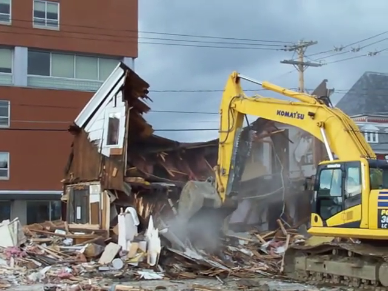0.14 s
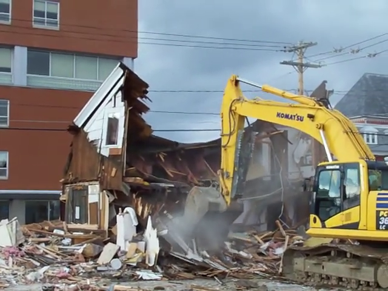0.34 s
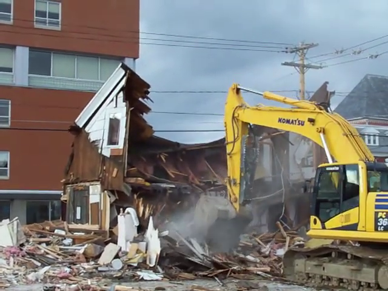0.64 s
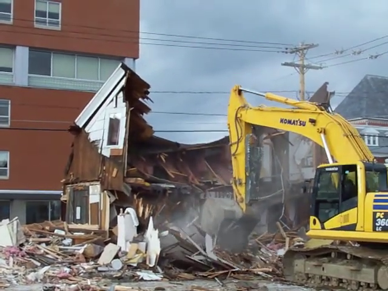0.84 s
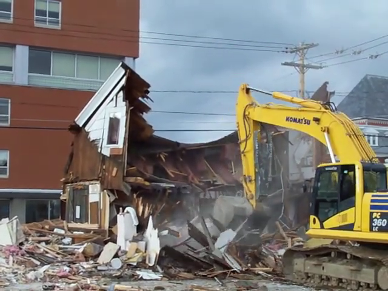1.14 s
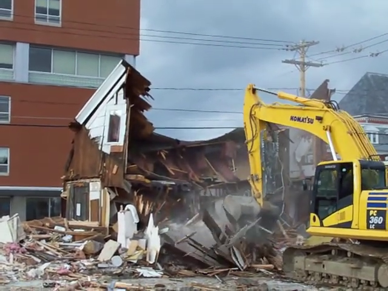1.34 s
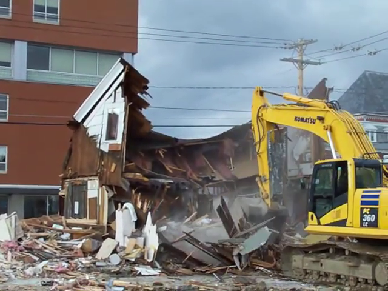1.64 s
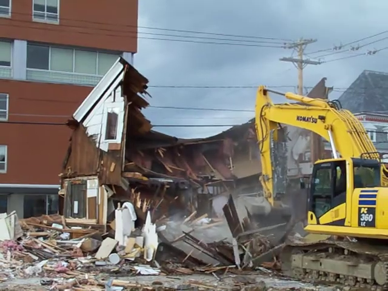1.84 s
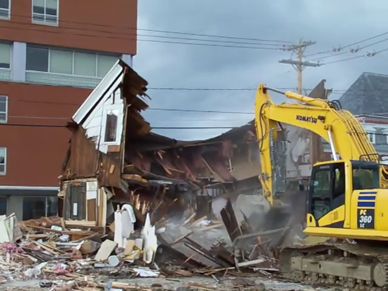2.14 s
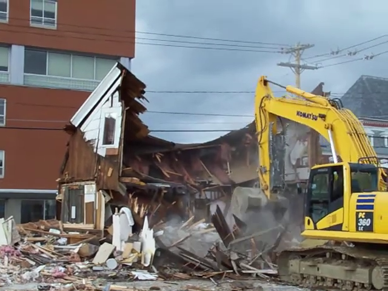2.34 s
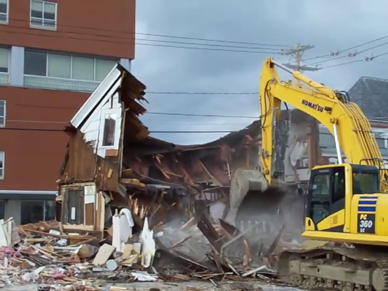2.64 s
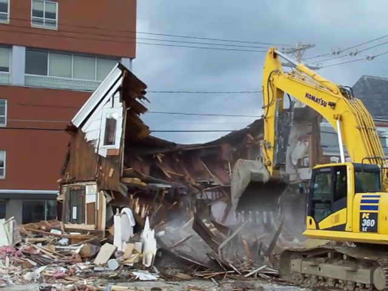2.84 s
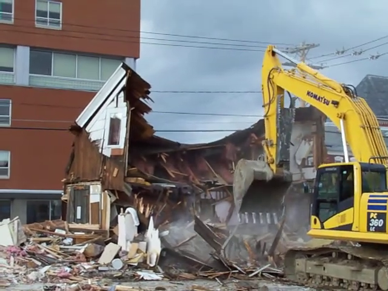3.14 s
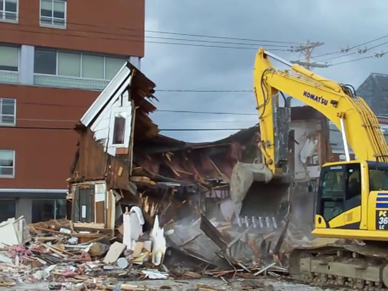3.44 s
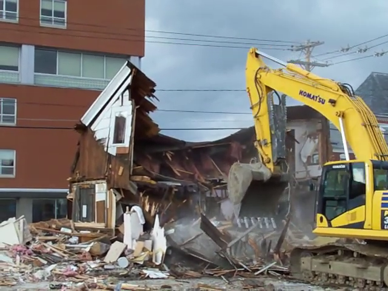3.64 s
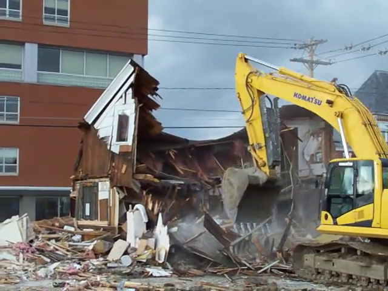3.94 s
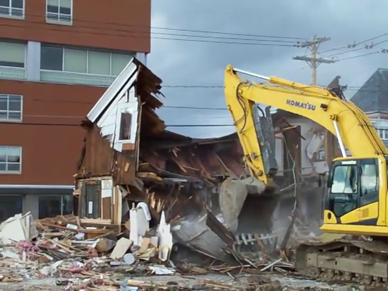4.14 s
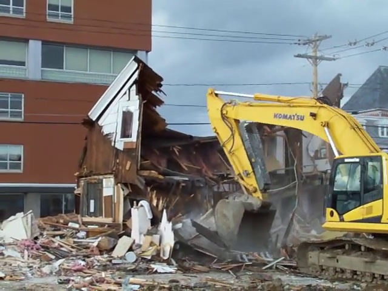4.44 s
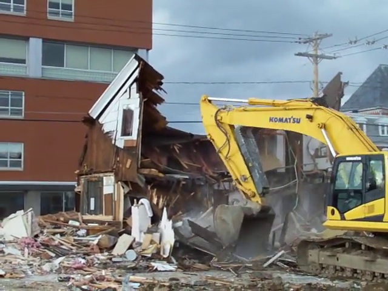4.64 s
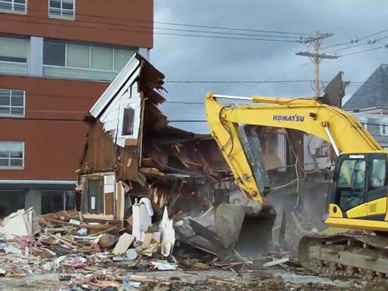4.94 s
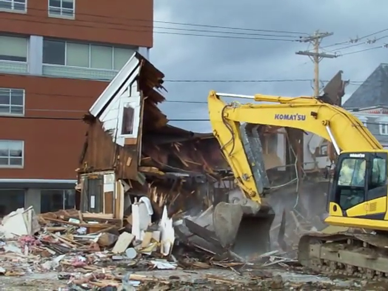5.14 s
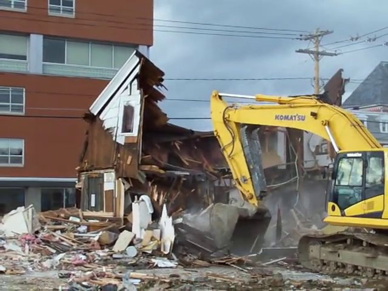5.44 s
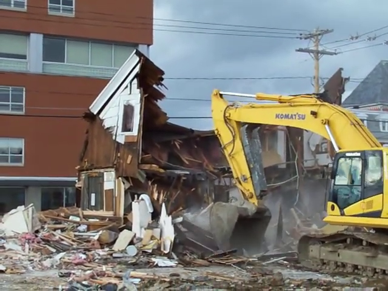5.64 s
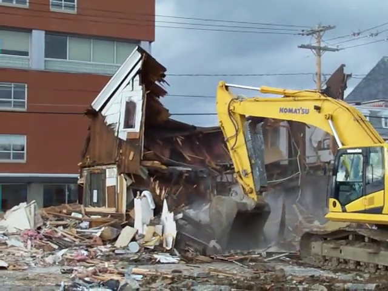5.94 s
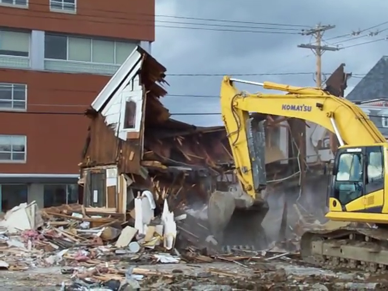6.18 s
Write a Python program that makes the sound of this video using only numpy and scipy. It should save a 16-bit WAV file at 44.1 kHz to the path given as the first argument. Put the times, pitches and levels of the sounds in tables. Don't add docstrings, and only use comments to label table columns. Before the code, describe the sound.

An excavator drags through a wooden house: splintering laths, hissing grit, two heavy crashes separated by a windy lull, engine droning low throughout.

```python
import sys
import numpy as np
from scipy import signal
from scipy.fft import rfft, irfft, next_fast_len
from scipy.io import wavfile
from scipy.ndimage import uniform_filter1d

SR = 44100
rng = np.random.default_rng(int(sys.argv[2]) if len(sys.argv) > 2 else 0)


def wrap_up_sound(samples):
    columns = np.atleast_2d(samples).T
    tamed = np.clip(columns, -1, 1)
    steps = np.round(tamed * 32767).astype(np.int16)
    wavfile.write(sys.argv[1], SR, steps)


def convert_level_to_amplitude(level_db):
    exponent = np.asarray(level_db, float) / 20
    return 10 ** exponent


N = 278271


def evened(x):
    return x / np.sqrt(np.mean(x ** 2) + 1e-20)


def read(points, hz):
    f, value = np.transpose(points)
    return np.interp(np.log(hz + 1), np.log(f + 1), value)


def columns(rows):
    s, *rest = np.transpose(rows)
    return [np.interp(np.arange(N) / SR, s, c) for c in rest]


def coloured(x, points):
    size = next_fast_len(N)
    gain = convert_level_to_amplitude(read(points, np.fft.rfftfreq(size, 1 / SR)))
    return evened(irfft(rfft(x, size) * gain, size)[..., :N])


def lumps(per_s, channels):
    width = max(int(SR / per_s), 2)
    smooth = uniform_filter1d(rng.standard_normal((channels, N)), width)
    return evened(uniform_filter1d(smooth, width))


def add(mix, s, sound):
    part = mix[:, round(s * SR):][:, :sound.shape[1]]
    part += sound[:, :part.shape[1]]


def sides(pan_db):
    return convert_level_to_amplitude(np.array([pan_db / 2, -pan_db / 2]))


# start_s, peak_db, pitch_hz, left_right_db
LATHS = [(.0706, -15, 3360, 21), (0.19, -14, 3910, 18.5), (.314, -18.5, 3730, 2), (0.746, -9.5, 3440, -16),
         (.821, -9, 3460, -15), (1.0726, -5, 3988, -1.5), (1.264, -12.5, 3839, 4.5),
         (1.6201, -17, 3600, -16), (1.727, -14, 3520, 17.5), (1.966, -14.5, 3500, 2),
         (2.06, -20.5, 3630, 17), (4.391, -11.5, 3480, 6.5), (4.4603, -10, 3280, -10.5),
         (4.545, -1.5, 3420, -8), (4.7585, -19.5, 3635, -7), (.325, -19, 5600, 2), (1.12, -11, 4000, 2.5),
         (.846, -8.5, 3300, -3), (5.202, -9.5, 5600, 3.5), (5.778, -15, 5300, 2), (6.091, -10.5, 5820, 6),
         (5.2791, -15, 3520, 7), (5.4796, -18, 5006, 7), (5.8408, -8, 3590, -1), (5.893, -14, 3500, -16.5),
         (6.0188, -15, 3500, 4), (6.108, -10.5, 3260, 10), (6.166, -7.5, 3230, 9)]
# start_s, peak_db, pitch_hz, left_right_db
BOARDS = [(0.326, -18.5, 1900, -3), (0.719, -10.5, 2520, -6), (2.2546, -26.5, 2550, 10.5),
          (2.4808, -24, 1910, 2), (2.534, -15, 1870, -10), (2.7036, -19, 1055, -16),
          (2.986, -31.5, 1650, -4), (3.3746, -21.5, 1010, -13), (3.4271, -18, 1090, -27),
          (3.671, -14, 1824, 8), (3.7418, -17.5, 2770, -3), (3.809, -16, 1720, 10), (4.29, -17, 1744, -1),
          (4.6185, -5, 2320, -12.5), (4.796, -13, 1600, -5), (4.8486, -10, 2720, 5.5),
          (6.092, -10.5, 1730, 13)]
# start_s, peak_db, pitch_hz, left_right_db
BEAMS = [(1.075, -14.5, 598, 2), (2.6, -20.5, 744, -4), (2.479, -10, 557, -9), (2.526, -10.5, 480, -8.5),
         (2.722, -12.5, 700, -11), (2.765, -20.5, 563, -8), (3.6, -15.5, 520, -10), (4.6, -3, 2050, -0.5),
         (4.972, -5, 2100, -1), (4.964, -8.5, 3500, 3.5), (2.034, -15, 560, -3), (0.17, -11.5, 600, -7),
         (2.15, -15.5, 550, -4.5), (3.035, -16.5, 1800, -2), (3.3, -18.5, 2130, -2), (2.37, -16, 650, -6),
         (2.42, -18, 460, -6), (5.21, -16, 700, -3), (5.29, -15.5, 800, -4), (5, -12.5, 970, -5),
         (5.525, -13.5, 765, -6), (4.8, -16, 700, -2), (5.93, -15, 600, -5.5), (6.05, -15, 560, -4),
         (5.481, -13.5, 5150, 7), (5.234, -11.5, 1100, 0)]


def timber():
    out, t = np.zeros((2, N)), np.arange(9000) / SR
    wide = signal.butter(2, [700, 6500], "band", fs=SR)
    kinds = [(LATHS, 0.077, 1., .5), (BOARDS, 0.088, .6, .45), (BEAMS, 0.18, .12, 0.34)]
    for pieces, t60, hiss_share, width_share in kinds:
        for s, db, hz, pan_db in pieces:
            burst = rng.standard_normal(len(t))
            r = np.exp(-np.pi * width_share * hz / SR)
            pole = [1, -2 * r * np.cos(2 * np.pi * hz / SR), r * r]
            ring = signal.lfilter([1], pole, signal.lfilter([1, 0, -1], pole, burst))
            splinters = evened(ring) + hiss_share * evened(signal.lfilter(*wide, burst))
            splinters *= convert_level_to_amplitude(db - 12.0 - 60 * t / t60) * np.minimum(t / 0.0026, 1)
            add(out, s, splinters * sides(.5 * pan_db)[:, None])
    return out


# start_s, peak_db, pitch_hz, left_right_db
SNAPS = [(0.0794, -15, 3300, 9), (0.187, -6, 3810, 21.5), (0.375, -10, 2340, -3), (0.4445, 1, 2320, -9),
         (0.7853, -6.5, 4700, -12.5), (0.9863, -10, 3590, 4), (1.1578, -1.5, 4170, 5.5),
         (1.385, -10, 2010, 14), (1.8752, -11, 2180, 1), (2.033, -18.5, 3530, 12), (2.9177, -15, 2150, -4),
         (3.483, -11.5, 3350, -14), (4.4212, -5.5, 3500, 3), (4.6158, 1, 2330, 13), (4.9331, -12, 3580, 8),
         (5.775, -7.5, 4080, -0.5), (6.2587, -14, 2860, -23)]
# start_s, peak_db, pitch_hz
TICKS = [(.0697, -12, 2600), (.2563, -19.5, 2700), (.3546, -15, 2650), (.4045, -14, 2760),
         (.5267, -13.5, 2340), (.5886, -20, 2900), (.7033, -15, 1950), (.796, -16.5, 4930),
         (1.0835, -4, 3600), (1.3463, -14, 2940), (2.0338, -12.5, 1950), (3.3742, -20, 3470),
         (4.9062, -18.5, 3530), (4.9064, -26, 5800), (4.9612, -6, 2000), (4.968, -9.5, 1900),
         (4.981, -9.5, 2100), (4.852, -14, 3880), (4.76, -18, 5530), (3.59, -23, 4200), (3.743, -23, 5000),
         (3.808, -20, 2500), (6.166, -12, 5000), (6.261, -14, 4520), (5.894, -16.5, 6200),
         (.077, -14, 2300), (5.215, -5, 4920), (5.221, -7, 6070), (5.231, -8, 3360), (5.2824, -10.5, 3600),
         (5.506, -17, 5100), (2.27, -25, 4970), (2.918, -22, 4200), (.234, -15.5, 3500),
         (5.535, -15.5, 3004), (5.556, -19, 4800), (6.11, -11, 3130)]


def snaps_and_ticks():
    out, t = np.zeros((2, N)), np.arange(9000) / SR
    snap_s, tick_s, tick_pan_db = 0.0013, .001, 2.0
    hits = [(*row, snap_s) for row in SNAPS] + [(*row, tick_pan_db, tick_s) for row in TICKS]
    for s, db, hz, pan_db, rise_s in hits:
        u = t / rise_s
        envelope = u ** 2 * np.exp(2 - 2 * u)
        modes = sum(g * np.sin(2 * np.pi * k * hz * t) for k, g in [(.8, 0.6), (1, 0.92), (1.22, 0.34)])
        add(out, s, convert_level_to_amplitude(db - 5.5) * envelope * modes * sides(.5 * pan_db)[:, None])
    return out


# start_s, level_db, pitch_hz, t60_s
PINGS = [
    (1.921, -24, 5320, .16),
    (3.996, -21, 1430, .1),
    (3.997, -28, 3500, .08),
    (3.998, -30, 2300, .07),
    (4.087, -27, 1430, .08),
    (4.617, -17, 2380, .15),
]


def pings():
    out, t = np.zeros((2, N)), np.arange(9000) / SR
    for s, db, hz, t60 in PINGS:
        wobble = 0.5 * np.sin(2 * np.pi * 37 * t)
        ring = np.minimum(t / 0.0011, 1) * np.sin(2 * np.pi * hz * t + wobble)
        add(out, s, convert_level_to_amplitude(db - 60 * t / t60) * ring * np.ones((2, 1)))
    return out


def clatter(ticks_per_s, spread_db, cycles=5.1, kinds=16):
    size = convert_level_to_amplitude(spread_db * np.minimum(rng.exponential(1, N), 3.5)) * (rng.random(N) < ticks_per_s / SR)
    kind, t = rng.integers(0, kinds, N), np.arange(600) / SR
    out = np.zeros(N)
    for k, hz in enumerate(np.geomspace(1500, 7000, kinds)):
        ring = np.sin(2 * np.pi * hz * t) * np.exp(-t * hz / cycles) * np.sqrt(hz)
        out += signal.oaconvolve(size * (kind == k), ring)[:N]
    return evened(out)


# pitch_hz, density_db_per_hz
GRIT = [(410, -55.5), (700, -23.5), (841, 3.5), (962, 3.5), (1090, 3), (1360, -6), (1920, -1), (2670, -3.5),
        (3240, -1.5), (4900, -7.5), (7000, -17.5), (9100, -26.5), (15400, -120)]


def grit_hiss(tilt_db):
    clatter_share, port_share = 0.39, .35
    clump_db, patchy_db = .8, 1.3
    hits = clatter_share * clatter(ticks_per_s=900, spread_db=1.5) + rng.standard_normal(N)
    grit = coloured(hits + port_share * rng.standard_normal((2, N)), GRIT)
    grit = grit * convert_level_to_amplitude(clump_db * lumps(30, 1)[0])
    hz, t, z = signal.stft(grit, SR, nperseg=512, noverlap=384)
    chance = rng.standard_normal(z.shape[:0:-1])
    patches = evened(uniform_filter1d(uniform_filter1d(chance, 9, 0), 7, 1)).T
    tilt = np.interp(t * SR, np.arange(N), tilt_db) * np.log2((hz[:, None] + 100) / 3300)
    shaped = z * convert_level_to_amplitude(patchy_db * patches + tilt)
    return evened(signal.istft(shaped, SR, nperseg=512, noverlap=384)[1][:, :N])


# time_s, effort_db, left_right_db
DRAG = [(0, -34.5, 10.5), (.15, -33.5, 17.5), (.3, -29.5, -3), (.55, -24, 6.5), (.68, -29, -0.5),
        (.98, -25.5, 2), (1.3, -24.5, 5), (1.65, -28.5, 5.5), (2.1, -32.5, 9.5), (2.65, -40.5, 5),
        (2.95, -35.5, -8.5), (3.5, -35.5, -6), (4.0, -35.5, 8), (4.3, -31.5, 3), (4.85, -34, 2),
        (5.45, -28, 9.5), (6.0, -28.5, 4), (6.31, -27, -9.5)]
# peak_s, peak_db, swell_10db_s, fade_10db_s, brightness_db_per_octave
SLIDES = [(.09, -29, 0.5, 0.5, 4), (.21, -22, 0, 0.02, 2.5), (0.791, -19.5, 0.07, 0.4, 5),
          (1.25, -19, 0.06, 0.07, 1), (1.742, -15.5, 0.03, 0.0533, 4), (1.871, -26, 0.25, 0.07, 6.5),
          (2.33, -30, .1, 0.16, 2.5), (2.49, -30, 0.12, 0.08, 0.5), (2.64, -31, 0.1, 0.06, 2.5),
          (3.05, -31, 0.13, 0.08, -3.5), (4.05, -34, 0.1, 0, 1.5), (3.38, -30, 0.08, 0.17, 0.5),
          (3.76, -35, 0.3, 0.2, -3.5), (5.33, -22.5, 0.08, 0, 1.5), (4.4, -20, 0.0643, 0.18, 4.5),
          (4.508, -15.5, 0.0833, 0.08, 6.5), (4.69, -19.5, 0.07, 0.04, 5), (4.77, -28.5, -0.06, 0.6, 0.5),
          (4.82, -25.5, -0.04, -2, -8), (5.099, -26.5, 0.14, 0.5, 8), (5.259, -16.5, 0.1348, 0.15, 1),
          (5.84, -21.5, 0.18, 0.2, 2), (6.141, -17, 0.1, 0.16, 4)]
# peak_s, peak_db, fade_10db_s, brightness_db_per_octave
CRASHES = [
    (1.074, -12, 0.086, -0.5),
    (2.92, -32.5, -0.05, -2.5),
    (4.547, -9, 0.09, 3.5),
    (4.619, -18.5, 0.1, 3.5),
    (5.203, -19, -0.01, 10),
    (5.484, -23.5, 0.2, 1),
]
# pitch_hz, density_db_per_hz
HEAVY = [(200, 0.5), (400, -3.5), (800, -0.5), (1200, -21.5), (1700, -2), (3000, -40.5)]


def rubble():
    drag_db, pan_db = columns(DRAG)
    now, power = np.arange(N) / SR, convert_level_to_amplitude(drag_db) ** 2
    bright = power * (0.11 * (drag_db + 30.5) - .3)
    crash_swell_s = .008
    falls = [*SLIDES, *[(s, db, crash_swell_s, *rest) for s, db, *rest in CRASHES]]
    for s, peak_db, swell_s, fade_s, tilt_db in falls:
        away = np.maximum((s - now) / max(swell_s, .005), (now - s) / max(fade_s, .005))
        slide = convert_level_to_amplitude(peak_db - 10 * away) ** 2
        power, bright = power + slide, bright + slide * tilt_db
    db = 10 * np.log10(power)
    grit = convert_level_to_amplitude(db - 3.0) * grit_hiss(bright / power)
    heavy = coloured(rng.standard_normal(N), HEAVY) * convert_level_to_amplitude(1.7 * lumps(36, 1)[0] + 1.8 * lumps(6.6, 1)[0])
    heavy_db = -32.5 - 3 + 0.62 * (db + 26.5)
    return (grit + convert_level_to_amplitude(heavy_db) * heavy) * sides(pan_db - 2.5 + 3.1 * lumps(5.8, 1)[0])


# time_s, pitch_hz, level_db
FIRING = [(0, 92.4, -26.5), (.4, 95.2, -30), (.7, 93.26, -27), (1.1, 90.2, -22.5), (1.4, 93.1, -32.5),
          (1.7, 96.14, -23), (2.0, 94, -28), (2.3, 91.6, -30), (2.6, 93.78, -29.5), (3.0, 92.06, -28.5),
          (3.5, 94.86, -26.5), (3.9, 95.63, -26.5), (4.3, 95.3, -38), (4.7, 89.5, -33.5), (5.1, 87.4, -28),
          (5.6, 94.17, -28.5), (6.0, 90.4, -31), (6.31, 87.6, -33)]
# time_s, pitch_hz, level_db
PUMP = [
    (4.5, 121, -41),
    (4.75, 121.9, -23.5),
    (5.05, 120.1, -38),
    (5.35, 120, -20),
    (5.65, 121.3, -35),
    (5.85, 118.4, -35),
    (6.1, 121.5, -27),
    (6.31, 113.4, -38),
]
# pitch_hz, density_db
ROAR = [(150, -20.5), (350, 14.5), (550, 10), (1100, 1.5), (1350, -2.5), (1800, 7), (3400, -28),
        (6400, -56.5), (9000, -36.5)]


def engine():
    hz, db = columns(FIRING)
    db, hz = db + 2.2 * lumps(9, 1)[0], hz * (1 + 0.025 * lumps(10, 1)[0])
    turns = np.cumsum(hz) / SR
    pump_hz, pump_db = columns(PUMP)
    pump = convert_level_to_amplitude(pump_db) * np.sin(2 * np.pi * np.cumsum(pump_hz) / SR)
    pump *= np.arange(N) > PUMP[0][0] * SR
    tones = convert_level_to_amplitude(db) * np.sin(2 * np.pi * turns) + pump
    puffs = rng.standard_normal(N) * (1 + .35 * np.cos(2 * np.pi * turns))
    roar = convert_level_to_amplitude(-40.5) * coloured(puffs, ROAR) * np.ones((2, 1))
    return np.sqrt(2) * tones * sides(-1.6)[:, None], roar


# peak_s, peak_db, pitch_hz, length_s
GROANS = [(1.12, -24, 200.6, .1), (1.41, -20.5, 169.9, .12), (1.5, -27, 109.2, .15),
          (2.56, -19, 100, 0.087), (3.22, -24.5, 201, .1), (3.41, -19, 144.7, .15), (3.5, -23, 99.7, 0.23),
          (4.81, -20.5, 150, .05), (5.62, -24, 205, .15), (5.68, -22.5, 95.5, .12), (6.18, -21, 135.2, .2)]


def groans():
    out, sag_per_s = np.zeros((2, N)), .3
    for s, db, hz, length in GROANS:
        t = np.arange(0, 2 * length, 1 / SR)
        swell = np.sin(np.pi * t / (2 * length)) ** 2
        tone = np.sin(2 * np.pi * hz * (t - sag_per_s * t ** 2 / 2))
        add(out, s - length, convert_level_to_amplitude(db) * swell * tone * sides(-2.5)[:, None])
    return out


# time_s, strength_db, left_right_db
WIND = [(0, -27, -2), (.32, -24, -3), (.7, -27, -0.5), (1.05, -29.5, -0.5), (1.4, -24.5, -2.5),
        (1.8, -26, 0), (2.15, -24, 2.5), (2.5, -24, -0.5), (2.75, -22, 1.5), (3.1, -24, -1), (3.45, -24, 0),
        (3.9, -27, 2), (4.3, -28, 3), (4.7, -29, -1), (5.21, -26.5, 0), (5.7, -26, -4.5),
        (6.0, -26.5, -6.5), (6.31, -22, -5)]
# pitch_hz, density_db_per_hz
RUMBLE = [(10, -16), (22, -0.5), (45, 1.5), (100, 3.5), (150, 1), (210, -4), (300, -9), (450, -41.5)]
# pitch_hz, density_db_per_hz
FLUTTER = [(200, -6), (330, 4), (430, 6), (560, 3), (800, -6.5), (1200, -9.5), (2500, -31)]


def wind():
    db, pan_db = columns(WIND)
    eddies = rng.standard_normal((2, 2, N))
    common = rng.standard_normal((2, N))
    lumpy, flicker = convert_level_to_amplitude(1.3 * lumps(13, 2)), convert_level_to_amplitude(3.0 * lumps(64, 2))
    rumble = coloured((eddies[0] + np.sqrt(0.22) * common[0]) * lumpy, RUMBLE)
    flutter = coloured((eddies[1] + np.sqrt(0.65) * common[1]) * flicker, FLUTTER)
    flutter_db = -30 + 0.61 * (db + 26.5)
    return (convert_level_to_amplitude(db + 6.5) * rumble + convert_level_to_amplitude(flutter_db) * flutter) * sides(1.55 * pan_db + 1.5)


# start_s, gain_drop_db, thump_db, left_right_db
THUMPS = [(0.088, 4.5, -2, -5.5), (0.24, 4.5, -3.5, 2.5), (0.615, 4, -3.5, -4.5), (0.693, 4.5, 0.5, 5.5),
          (0.859, 3.5, -6, -2), (1.267, 4.5, -5, -7), (1.784, 7.5, -17, -7.5), (1.978, 2, -1, -4.5),
          (2.092, 4, -8, 17.5), (2.284, 5.5, -9.5, -4.5), (2.367, 6.5, -6.5, 14.5), (2.513, 6.5, -5.5, -8),
          (2.648, 5.5, -12.5, -7), (2.713, 5, -7.5, -9), (2.793, 11, 0.5, -1.5), (3.217, 6.5, -10, -10),
          (3.404, 6, -20.5, 1), (4.112, 7, -4, 2), (4.228, 6, 2, -6), (4.863, 3, -7.5, -3),
          (4.992, 3, -29.5, 14), (5.354, 2, -11.5, 15), (5.685, 4.5, -12, 1), (6.152, 6, -3.5, 12),
          (6.21, 4, -7, 17)]


def thumps():
    out, u = np.zeros((2, N)), np.linspace(-3, 3, 900)
    push = (u ** 2 / 1.3 - 1) * np.exp(-u ** 2)
    for s, _, thump_db, side_db in THUMPS:
        add(out, s - .013, convert_level_to_amplitude(thump_db - 11.0) * push * sides(side_db)[:, None])
    return out


def yard(x, t60=0.27, wet_db=-2.5):
    t = np.arange(SR // 2) / SR
    signs = rng.choice([-1., 1.], (2, len(t)))
    taps = signs * (rng.random((2, len(t))) < .05) * convert_level_to_amplitude(-60 * t / t60) * (t > .003)
    taps = signal.lfilter([1, -.75], [1], taps)
    taps /= np.linalg.norm(taps[0])
    return x + convert_level_to_amplitude(wet_db) * signal.fftconvolve(x.mean(0)[None], taps, axes=1)[:, :N]


def scene():
    tones, roar = engine()
    cracks = timber() + snaps_and_ticks() + pings()
    return yard(cracks + rubble() + roar) + tones + groans() + wind() + thumps()


def gain_control(x):
    t, duck_db, recovery_db_per_s = np.arange(N) / SR, np.zeros(N), 63.5
    for s, drop_db, *_ in THUMPS:
        climb = np.interp(s, t, duck_db) + drop_db - recovery_db_per_s * (t - s)
        duck_db = np.where(t > s, np.maximum(climb, 0), duck_db)
    return x * convert_level_to_amplitude(2.0 - uniform_filter1d(duck_db, 130))


# pitch_hz, width_hz, gain_db
NOTCHES = [(298.8, 56.6, -14), (968, 32, -11.5), (1390, 140, -1), (3590, 240, 2)]
# pitch_hz, gain_db
TOP = [(6800, 0.12), (7500, -5.5), (8000, -19), (8500, -19), (9000, -48.5), (9600, -84)]
# pitch_hz, left_right_db
PORT_DB = [(60, 1.9), (180, -3), (400, -5), (910, -4), (1570, -1), (2710, 4.5), (4670, 3.5), (8040, -6.5)]
# pitch_hz, lead_rad
PORT_LEAD = [(0, 0), (950, 0.3), (1290, 1.2), (1550, 0.4), (2840, 1.1), (3450, 0.4), (4740, -0.0),
             (6030, 0.6), (6550, 0.4), (7320, 1.3), (8180, 0.0)]


def camera_ports(x):
    size = next_fast_len(N)
    hz = np.fft.rfftfreq(size, 1 / SR)
    body_db = read(TOP, hz) + sum(db / (1 + (2 * (hz - f) / w) ** 2) for f, w, db in NOTCHES)
    turn = np.exp(.5j * read(PORT_LEAD, hz))
    low_cut = hz / np.hypot(hz, 12)
    ports = low_cut * convert_level_to_amplitude(body_db) * sides(read(PORT_DB, hz)) * np.array([turn, 1 / turn])
    return irfft(rfft(x, size) * ports, size)[:, :N]


def moving_edge(x):
    hz, _, z = signal.stft(x, SR, nperseg=1024)
    treble = (abs(z[:, hz > 5500]) ** 2).sum((0, 1))
    top_db = 10 * np.log10(uniform_filter1d(treble, size=4)[::4] + 1e-12)
    chance = np.resize(lumps(11, 1)[0, ::2048], len(top_db))
    steps = 0.11 * (top_db - top_db.mean()) + .4 * chance
    edge_hz = 8200 + 340 * np.round(steps).repeat(4)
    kept = z * (hz[:, None] < np.resize(edge_hz, z.shape[2]))
    return signal.istft(kept, SR, nperseg=1024)[1][:, :N]


def roll_off(x):
    return signal.sosfilt(signal.butter(12, 8640, fs=SR, output="sos"), x)


def record(dry):
    x = moving_edge(camera_ports(gain_control(dry)))
    finished = np.clip(x, -.99, .99)
    return roll_off(finished)


dry = scene()
out = record(dry)
wrap_up_sound(out)
```